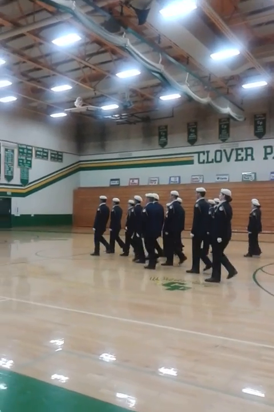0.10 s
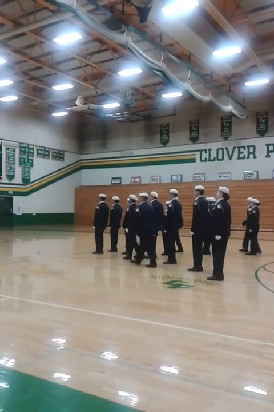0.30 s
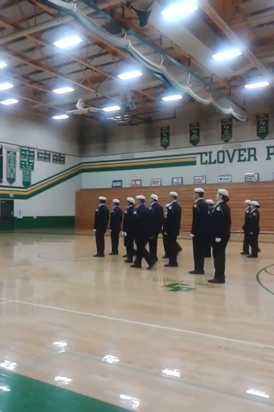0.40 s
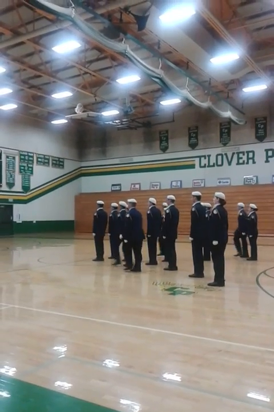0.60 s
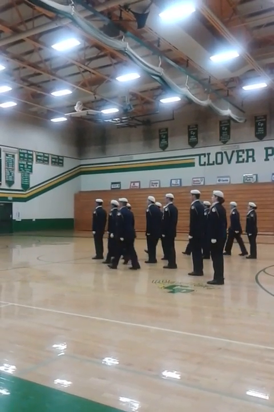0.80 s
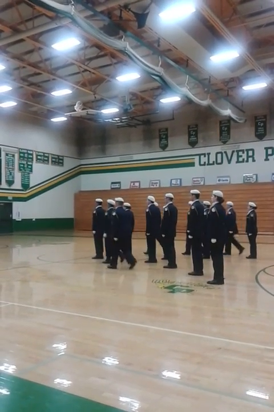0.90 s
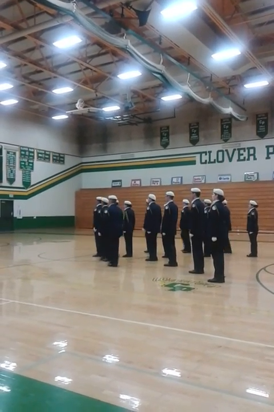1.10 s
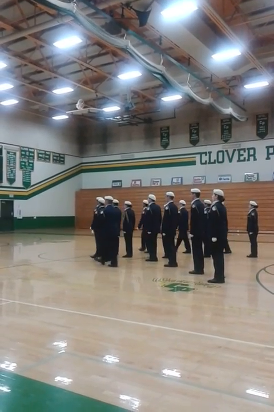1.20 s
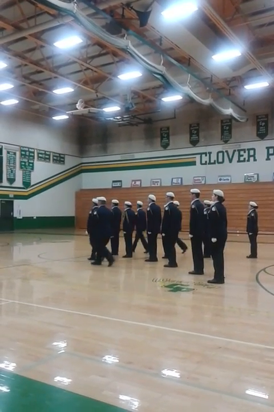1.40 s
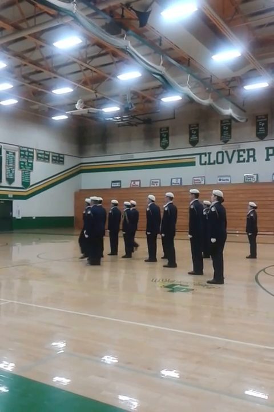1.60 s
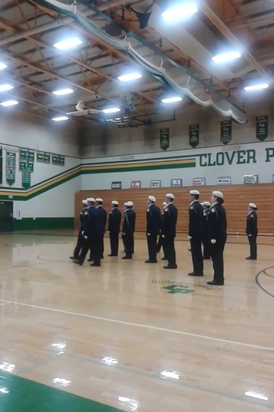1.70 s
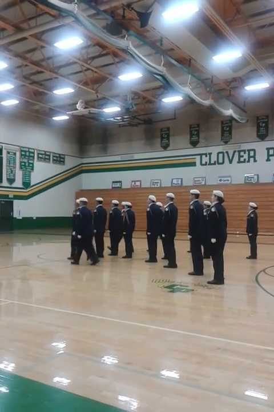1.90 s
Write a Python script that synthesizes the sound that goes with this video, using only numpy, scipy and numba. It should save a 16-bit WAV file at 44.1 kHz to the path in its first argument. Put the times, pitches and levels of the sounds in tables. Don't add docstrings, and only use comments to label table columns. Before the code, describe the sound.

A marching squad stamps heels almost together on a sprung wooden floor, a loud clipped crack and boom, then long hall reverberation fades under soft shuffling steps, sole ticks and faint squeaks; distant air hum.

```python
import sys
import numpy as np
from scipy import signal
from scipy.fft import rfft, irfft
from scipy.io import wavfile
from scipy.ndimage import uniform_filter1d
from numba import njit

SR = 44100
rng = np.random.default_rng(int(sys.argv[2]) if len(sys.argv) > 2 else 0)


def waveform_to_disk(signal):
    frames = np.transpose(np.atleast_2d(signal))
    scaled = np.clip(frames, -1, 1) * 32767
    samples = np.round(scaled).astype(np.int16)
    wavfile.write(sys.argv[1], SR, samples)


def volts_from_decibels(level):
    exponent = np.asarray(level, float) / 20
    return 10 ** exponent


N = 88200


def table(rows, hz):
    rows = np.array(rows, float)
    return np.interp(np.log(hz), np.log(rows[:, 0]), rows[:, 1])


def unit(x):
    return x / np.sqrt(np.mean(x ** 2))


def clicks(times, db):
    x = np.zeros(N)
    np.add.at(x, (np.asarray(times) * SR).astype(int), volts_from_decibels(db))
    return x


def conv(x, h):
    return signal.fftconvolve(x, h)[:N]


def decay(t, t60):
    return np.exp(-np.log(1000) * t / t60)


def mode(hz, t60, t):
    t = np.maximum(t, 0)
    return np.sin(2 * np.pi * hz * t) * decay(t, t60)


def bands(colour, shape):
    f = np.fft.rfftfreq(N, 1 / SR) + 1
    spectrum = rfft(rng.standard_normal(N)) * volts_from_decibels(table(colour, f))
    out = np.zeros(N)
    for hz in 25 * 2 ** (np.arange(29) / 3):
        window = np.maximum(1 - 3 * np.abs(np.log2(f / hz)), 0)
        out += irfft(spectrum * window, N) * shape(hz)
    return out


def walk(rate_hz):
    hold = int(SR / rate_hz)
    held = np.repeat(rng.standard_normal(N // hold + 1), hold)
    return 1.3 * uniform_filter1d(held, hold)[:N]


# freq_hz [Hz], density_db [dB per Hz]
AIR_SPECTRUM = [(25, -19), (80, -4.5), (200, 2), (650, -4.5), (2000, -11), (3800, -20), (8000, -22.5),
                (15000, -24.5)]
# freq_hz [Hz], density_db [dB per Hz]
RING_SPECTRUM = [(50, -28), (150, -9.5), (240, -3), (480, -10.5), (850, -9.5), (2500, -19), (7000, -29.5),
                 (14000, -35)]


def air(t):
    hum = unit(bands(AIR_SPECTRUM, lambda hz: volts_from_decibels(2.4 * walk(8.09))))
    earlier = unit(bands(RING_SPECTRUM, lambda hz: 1)) * decay(t, t60=0.94)
    return volts_from_decibels(-47) * hum + volts_from_decibels(-44.5) * earlier


# freq_hz [Hz], t60_s [s]
HALL_DECAY = [(60, 4), (130, 2.9), (260, 1.635), (700, 1.716), (2000, 1.63), (4000, 1.42), (8000, 0.77),
              (13000, 0.13)]


def hall(t, colour):
    build_s = 0.018
    response = bands(colour, lambda hz: decay(t, table(HALL_DECAY, hz)))
    response = response / np.sqrt(np.mean(response[:SR // 10] ** 2))
    return response * (1 - np.exp(-(t / build_s) ** 2))


# start_s [s], length_s [s], level_db [dB], centre_hz [Hz]
SCUFFS = [
    (1.149, 0.0096, -53, 3800),
    (1.504, 0.017, -50.5, 5000),
    (1.8, 0.0074, -39, 4200),
    (1.805, .013, -47.5, 5940),
    (1.376, 0.054, -52, 1980),
    (1.423, 0.044, -52.5, 2980),
]


def scuffs(t):
    grain = rng.standard_normal(N) * volts_from_decibels(4.9 * walk(700))
    out = np.zeros(N)
    for start_s, length_s, level_db, centre_hz in SCUFFS:
        b, a = signal.iirpeak(centre_hz, 0.7, fs=SR)
        rub = unit(signal.lfilter(b, a, grain))
        progress = np.clip((t - start_s) / length_s, 0, 1)
        out += volts_from_decibels(level_db) * rub * np.sin(np.pi * progress) ** 0.5
    return out


# start_s [s], length_s [s], level_db [dB], top_hz [Hz], fall_share [1]
SQUEAKS = [
    (.131, .015, -52, 7800, .02),
    (1.184, .032, -51, 4000, .11),
    (1.547, .03, -52, 4000, .11),
    (1.425, .03, -59, 4150, .04),
]


def squeaks(t):
    out = np.zeros(N)
    for start_s, length_s, level_db, top_hz, fall_share in SQUEAKS:
        progress = np.clip((t - start_s) / length_s, 0, 1)
        arch = 1 - fall_share * ((progress - 0.4) / 0.6) ** 2
        pitch_hz = top_hz * arch + 60 * walk(400)
        tone = np.sin(2 * np.pi * np.cumsum(pitch_hz) / SR)
        out += volts_from_decibels(level_db) * np.sin(np.pi * progress) * tone
    return out


# start_s [s], peak_db [dB], pitch_hz [Hz]
TICKS = [(1.259, -49, 900), (1.299, -40, 880), (1.373, -33, 900), (1.405, -33, 694), (1.505, -35, 1047),
         (1.593, -33.5, 1240), (1.622, -43, 1074), (1.661, -37.5, 1195), (1.755, -46, 1960),
         (1.799, -30, 1040), (1.82, -34, 1230), (1.91, -40, 1590), (1.937, -40, 1610), (1.971, -39.5, 810)]


def ticks(t):
    grit_s, t60_s = 0.0019, 0.019
    u = t[:SR // 20]
    out = np.zeros(N)
    for start_s, peak_db, pitch_hz in TICKS:
        grit = rng.standard_normal(len(u)) * np.exp(-u / grit_s)
        octaves = signal.butter(2, [pitch_hz / 2, pitch_hz * 2], "band", fs=SR, output="sos")
        grit = signal.sosfilt(octaves, grit)
        tick = mode(pitch_hz, t60_s, u) + 0.66 * mode(0.56 * pitch_hz, t60_s, u) + 1.6 * grit
        i = int(start_s * SR)
        out[i:i + len(u)] += volts_from_decibels(peak_db) * tick[:N - i]
    return out


# start_s [s], peak_db [dB], pitch_hz [Hz]
THUDS = [(0.011, -31.5, 246.5), (0.042, -34, 267.5), (0.091, -45, 278), (1.254, -29, 260),
         (1.294, -29.5, 298), (1.339, -34, 245), (1.375, -25, 255.5), (1.409, -29, 283), (1.453, -27, 236),
         (1.474, -27.5, 283), (1.5, -40.5, 248), (1.57, -33, 311), (1.591, -32.5, 232), (1.658, -31, 253),
         (1.82, -24, 292), (1.852, -33.5, 318), (1.888, -35.5, 275), (1.914, -31, 284), (1.939, -41, 280),
         (1.974, -39, 263)]


def thuds(t):
    t60_s, push_s = 0.052, 0.0021
    out = np.zeros(N)
    for start_s, peak_db, pitch_hz in THUDS:
        u = t - start_s
        push = 1 - np.exp(-np.maximum(u, 0) / push_s)
        out += volts_from_decibels(peak_db + 3.5) * mode(pitch_hz, t60_s, u) * push
    return out


# start_s [s], crack_db (sole) [dB], thump_db (boards) [dB]
HEELS = [(.209, -21, -25), (0.2178, 6.5, 0.5), (0.2212, -7, -8), (.229, -12.5, -4), (.242, -5, 0),
         (0.2463, -12.5, -7), (0.2521, -14, 3), (0.259, -13, -2.5), (0.268, -7, -1.5), (.294, -16, 8.5),
         (.321, -12, -7), (.342, -15, -5.5), (0.42, -20, -7)]
# pitch_hz [Hz], level_db [dB], t60_s [s]
SOLE_MODES = [(1340, -1, 0.025), (1850, 2.5, 0.013), (2110, 1, 0.013), (2770, 2.5, 0.013),
              (3590, 3.5, .012), (5180, -9, 0.016), (6950, -17.5, 0.011), (8400, -3, 0.0052),
              (10180, -20, 0.0061), (14700, -27, .006)]
# pitch_hz [Hz], level_db [dB], t60_s [s]
BOARD_MODES = [(173, -28, 0.28), (245, -2.5, 0.072), (301, -9.5, 0.058), (414, -18.5, 0.038),
               (796, 0, 0.031)]


def heel(crack_db, thump_db, u):
    crack_s, rise_s = 0.0013, 0.00048
    modes = [*SOLE_MODES, *BOARD_MODES]
    drive_db = [crack_db - 6.5] * len(SOLE_MODES) + [thump_db - 7] * len(BOARD_MODES)
    level_shift, pitch_shift = rng.standard_normal((2, len(modes)))
    hit = np.zeros(len(u))
    for k, (pitch_hz, level_db, t60_s) in enumerate(modes):
        gain = volts_from_decibels(level_db + 2 * level_shift[k] + drive_db[k])
        hit += gain * mode(pitch_hz * (1 + pitch_shift[k] / 50), t60_s, u)
    hit += volts_from_decibels(crack_db - 7) * rng.standard_normal(len(u)) * np.exp(-u / crack_s)
    return hit * (1 - np.exp(-u / rise_s))


def stamp(t):
    u = t[:SR // 5]
    direct = np.zeros(N)
    for start_s, crack_db, thump_db in HEELS:
        i = int(start_s * SR)
        direct[i:i + len(u)] += heel(crack_db, thump_db, u)
    heels = np.array(HEELS)
    blows = clicks(heels[:, 0], heels[:, 1])
    blows = blows / np.sqrt(np.sum(blows ** 2))
    return direct + volts_from_decibels(-11.5) * conv(blows, hall(t, RING_SPECTRUM))


def scene():
    t = np.arange(N) / SR
    soft = thuds(t) + ticks(t) + scuffs(t) + squeaks(t)
    wet = conv(soft, hall(t, [(20, 6.5), (20000, -4)])) / 10
    return (stamp(t) + soft + volts_from_decibels(-29.5) * wet + air(t))[None]


# freq_hz [Hz], gain_db [dB]
MIC_RESPONSE = [(40, -17), (140, 1), (3100, -1), (3700, 0.5), (4400, -5.5), (6100, -7.5), (8400, -2.5),
                (15000, -10.5)]


def microphone(x):
    size = 2 * N
    gain = volts_from_decibels(table(MIC_RESPONSE, np.fft.rfftfreq(size, 1 / SR) + 1))
    return irfft(rfft(x, size) * gain, size)[:N]


@njit
def follow(x, release):
    e, out = 0., np.empty(len(x))
    for i in range(len(x)):
        e = max(abs(x[i]), e * release)
        out[i] = e
    return out


def limiter(x):
    ceiling_db, release_s = 1, 0.048
    env = follow(x, np.exp(-1 / (release_s * SR)))
    gain = np.minimum(1, volts_from_decibels(ceiling_db) / (env + 1e-9))
    return x * uniform_filter1d(gain, size=64)


def drop_faint_treble(x):
    from_hz, floor_db, slope_db_per_khz = 7900, -61, 1.9
    f, _, z = signal.stft(x, SR, nperseg=512)
    f = f[:, None]
    power = uniform_filter1d(np.abs(z) ** 2, size=5, axis=1)
    local = uniform_filter1d(power, size=9, axis=0)
    limit = power.sum(0) * volts_from_decibels(2 * (floor_db + slope_db_per_khz * (f - from_hz) / 1000))
    keep = (local > limit) | (f < from_hz)
    return signal.istft(z * keep, SR, nperseg=512)[1][:N]


def top_cut(x):
    return signal.sosfilt(signal.butter(12, 15960, fs=SR, output="sos"), x)


def record(dry):
    x = limiter(microphone(dry[0]))
    x = np.clip(1.252 * x, -1, 1)
    x = signal.sosfilt(signal.butter(2, 70, "high", fs=SR, output="sos"), x)
    x = signal.sosfilt(signal.ellip(6, 0.3, 50, 15600, fs=SR, output="sos"), x)
    mix = np.clip(drop_faint_treble(x), -1, 1)[None]
    return top_cut(mix)


dry = scene()
out = record(dry)
waveform_to_disk(out)
```